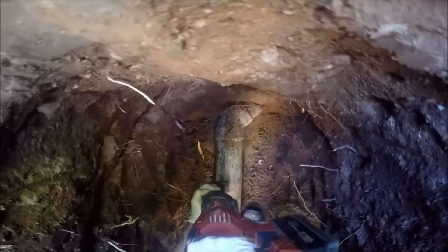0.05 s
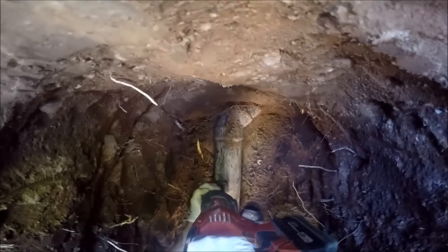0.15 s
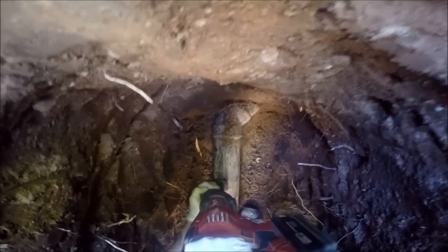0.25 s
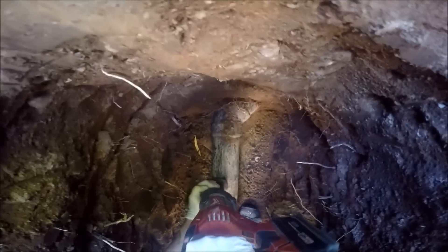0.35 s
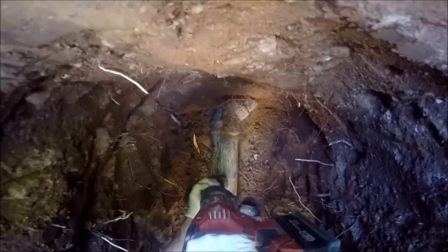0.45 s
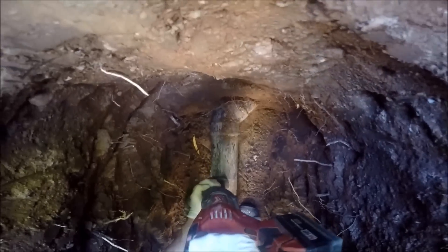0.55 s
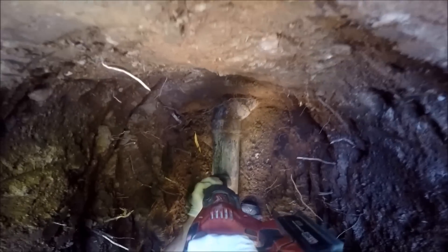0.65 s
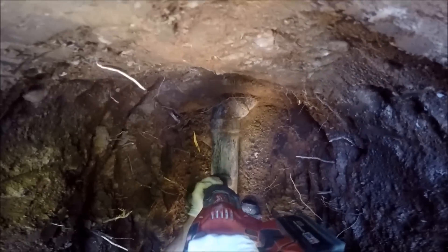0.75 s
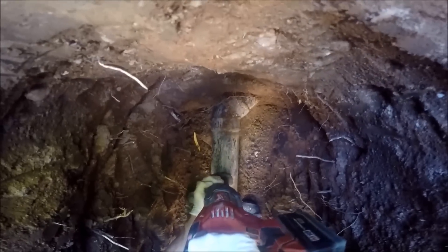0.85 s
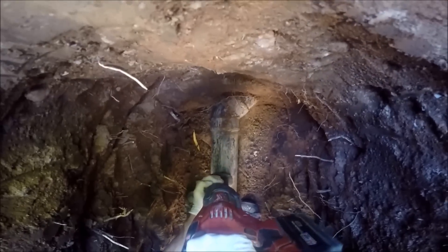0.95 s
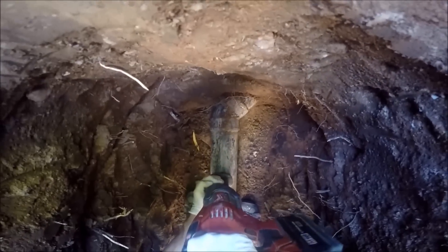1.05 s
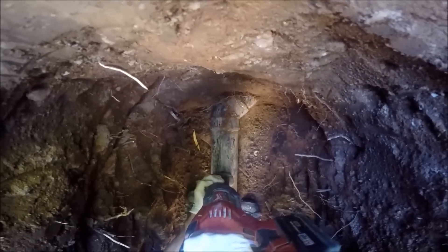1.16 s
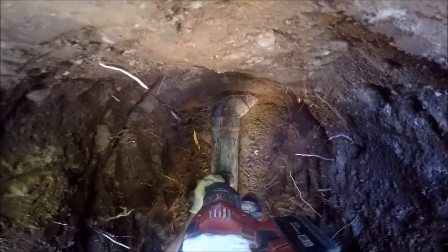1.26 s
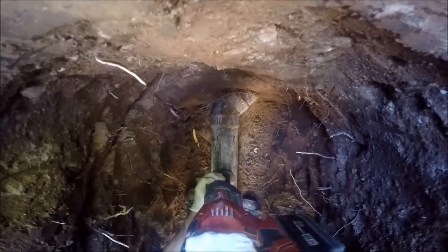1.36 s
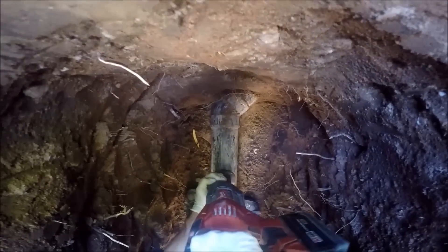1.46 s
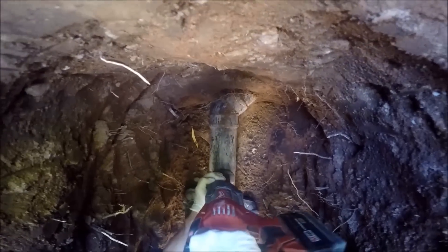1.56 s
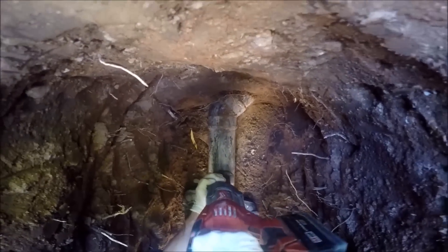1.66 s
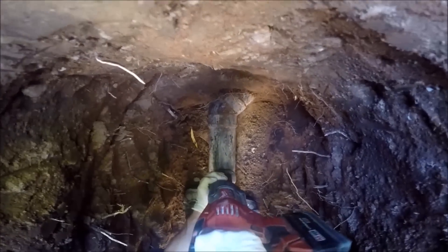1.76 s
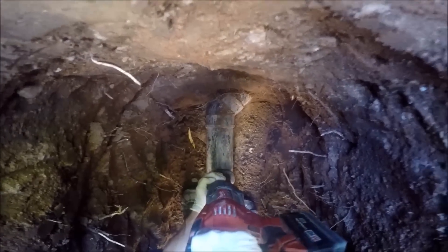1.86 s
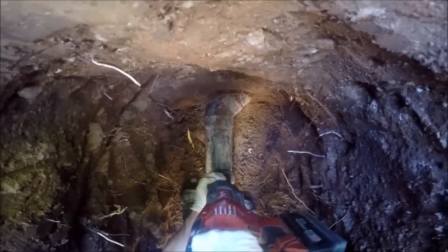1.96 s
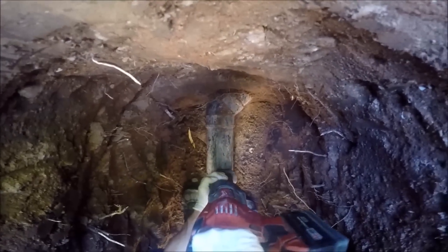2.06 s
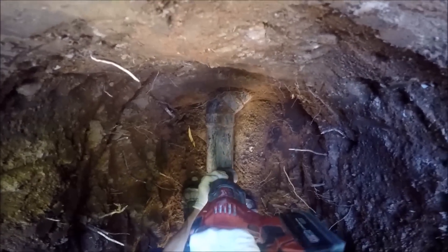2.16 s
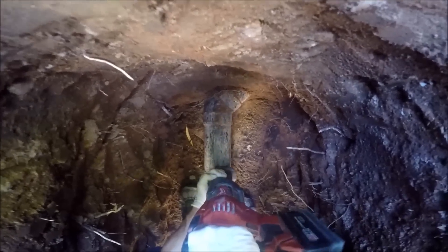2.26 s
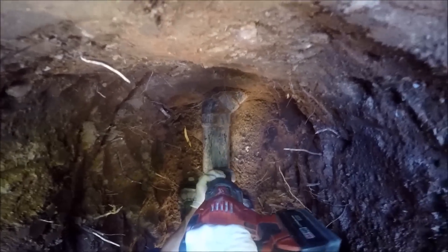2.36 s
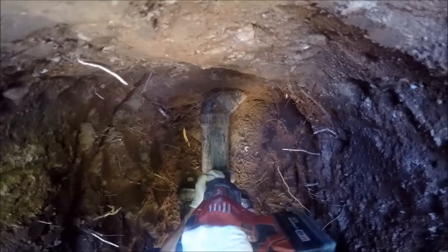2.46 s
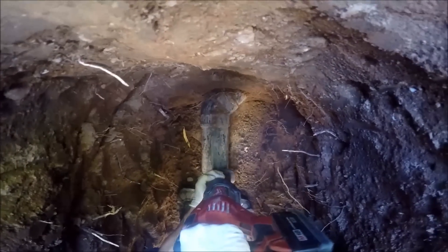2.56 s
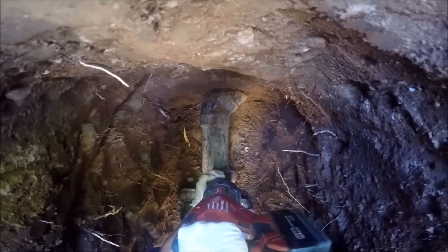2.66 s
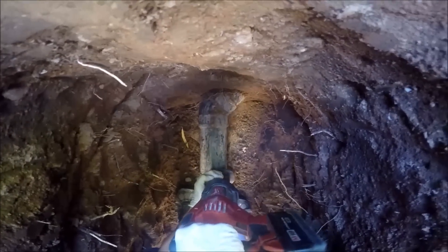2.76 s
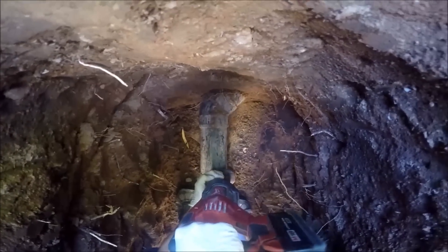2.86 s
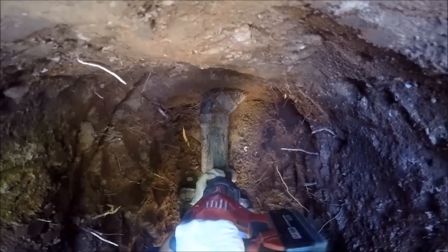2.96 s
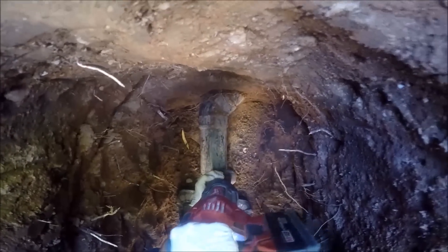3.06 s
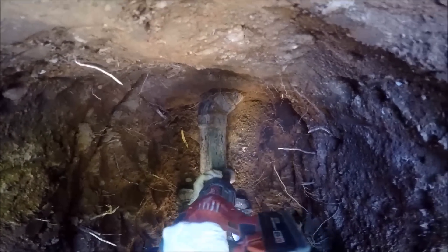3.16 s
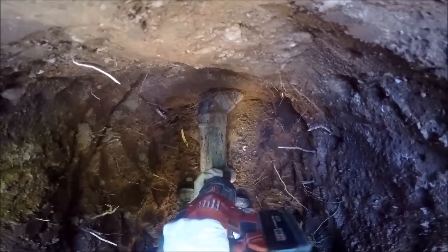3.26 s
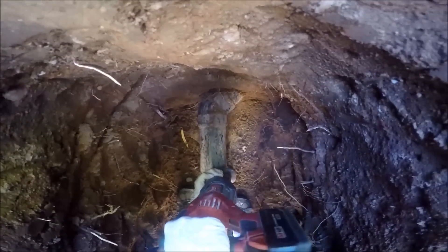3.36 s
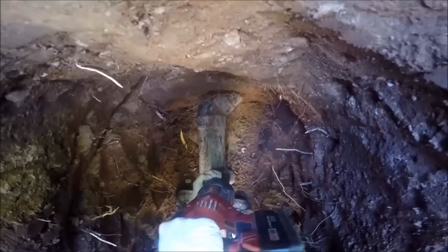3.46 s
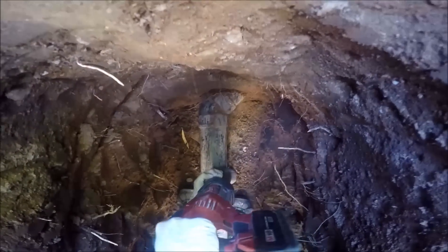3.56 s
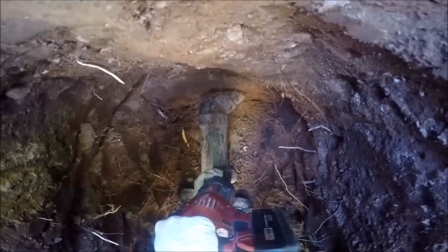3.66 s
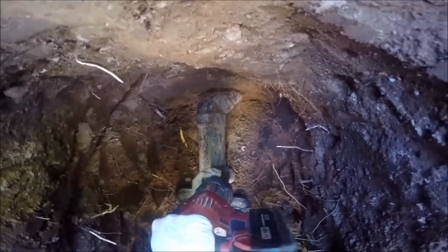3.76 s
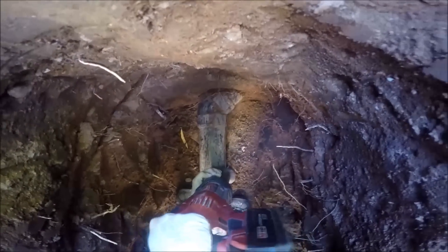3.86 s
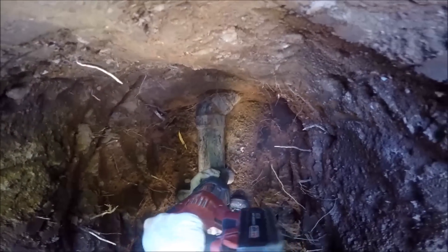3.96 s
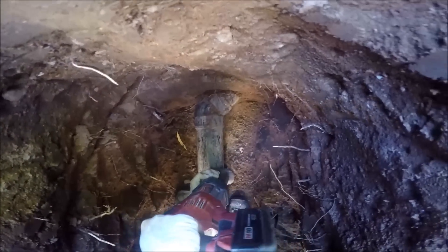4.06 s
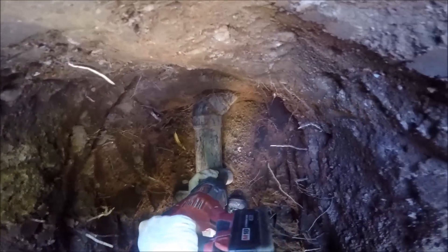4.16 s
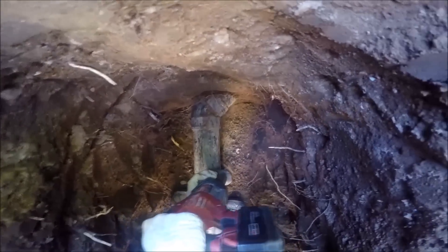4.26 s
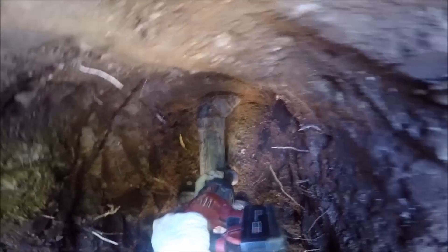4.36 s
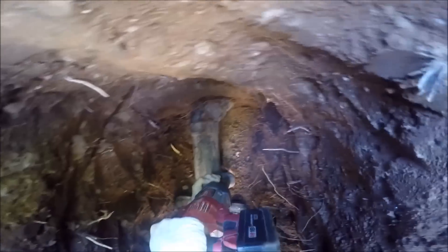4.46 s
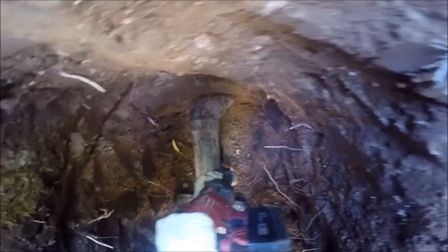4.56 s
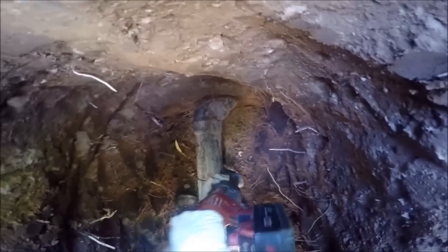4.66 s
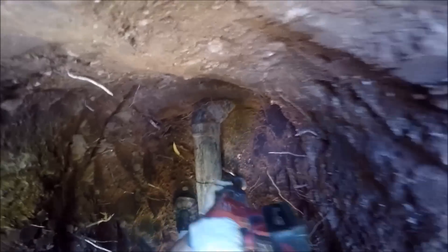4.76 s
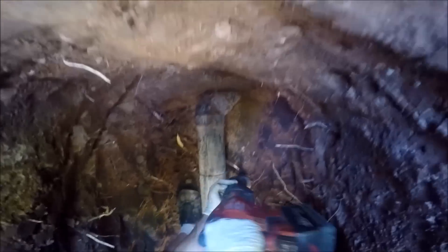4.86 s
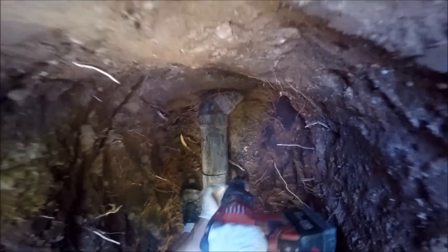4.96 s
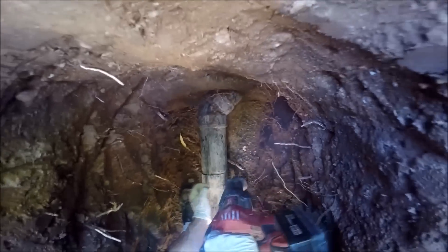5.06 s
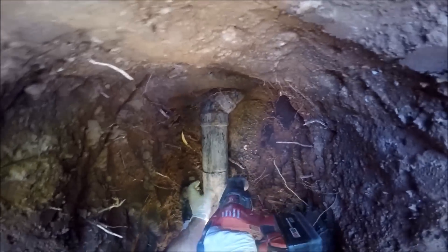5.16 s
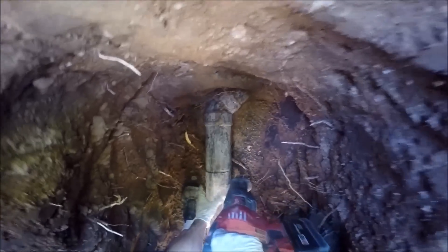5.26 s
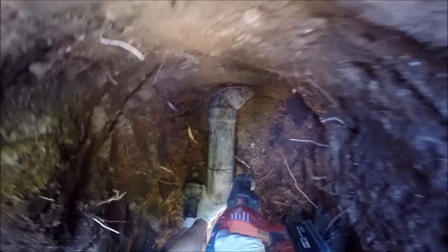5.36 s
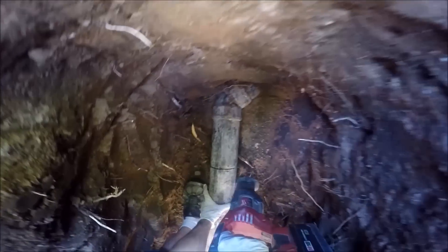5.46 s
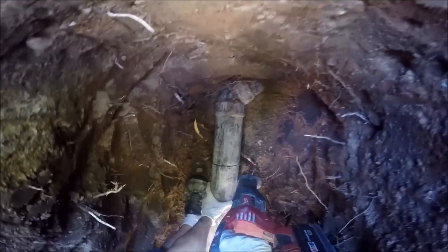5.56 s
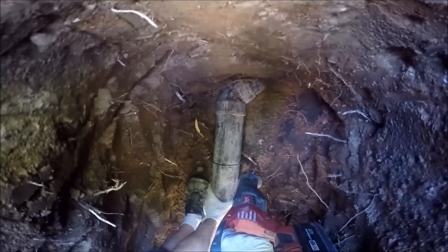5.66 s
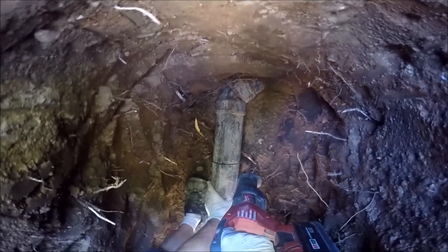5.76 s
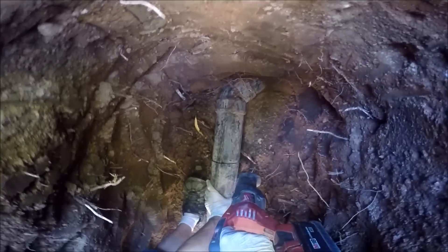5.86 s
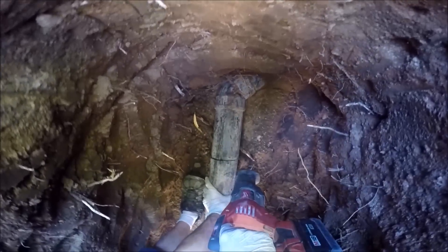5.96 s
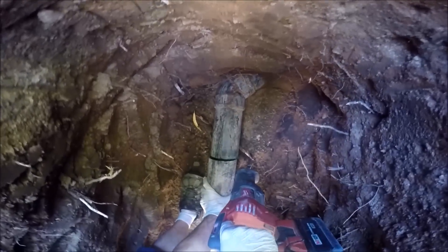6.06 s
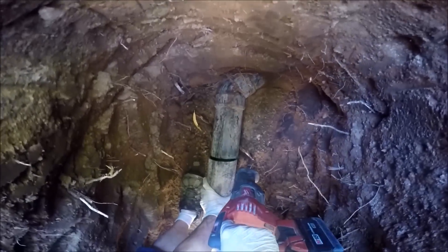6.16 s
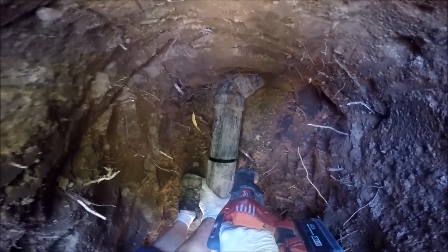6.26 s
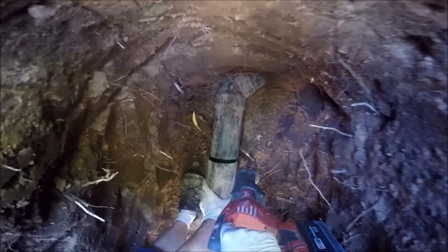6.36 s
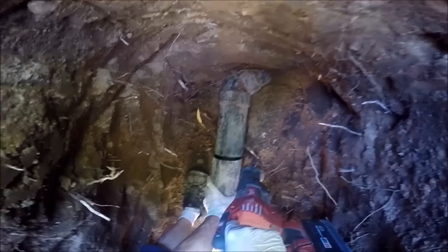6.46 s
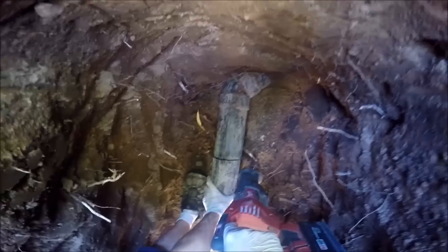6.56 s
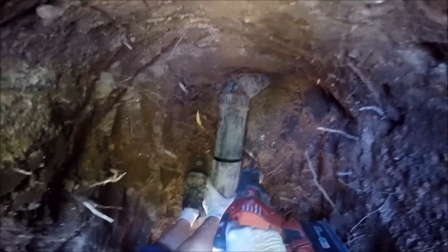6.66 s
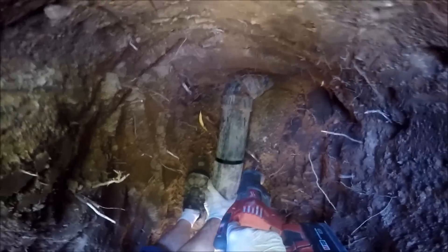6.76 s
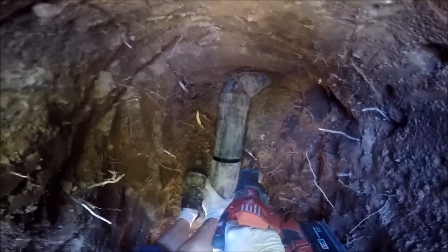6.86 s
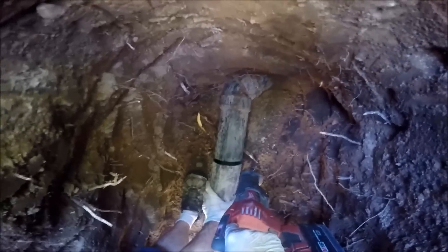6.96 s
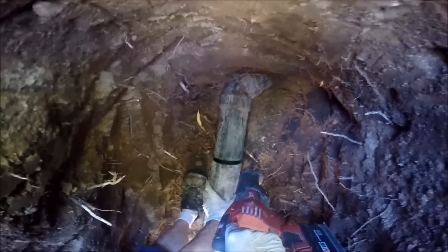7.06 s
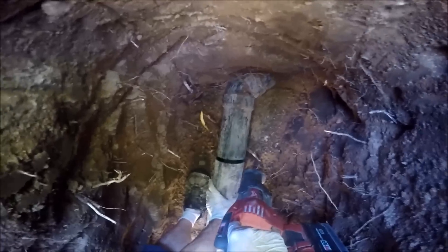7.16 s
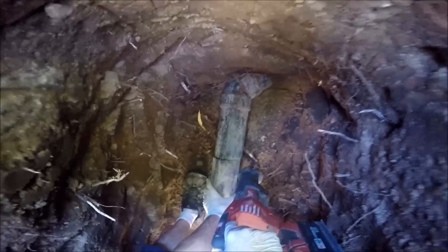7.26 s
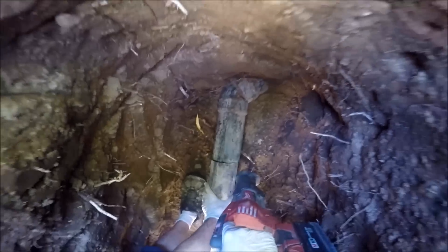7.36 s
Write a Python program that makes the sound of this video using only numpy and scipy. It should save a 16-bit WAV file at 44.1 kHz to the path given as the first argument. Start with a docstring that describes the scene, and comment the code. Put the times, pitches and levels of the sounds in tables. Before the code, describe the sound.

A saw is already running at full force: droning motor, rapid hammering of its shoe on a half-buried pipe, teeth tearing plastic. The knocking is roughest early and around two to three seconds, then smoother, brighter rasping takes over until the cut parts and the saw abruptly stops. Close, dry outdoor sound follows, with faint blade ringing, scraping gloves, grit ticks and muffled bumps.

```python
"""At the bottom of an earth pit, a cordless reciprocating saw cuts a plastic sewer pipe near a head-worn camera.
Each stroke shakes the tool, drones on its overtones, rasps the teeth through the wall and knocks the shoe
on the pipe, harder when the blade grabs. Filtered grains make the rasp, struck resonances the knocks.
The pipe parts and the saw falls silent; gloves scrape, the loose pipe and the saw bump, and the camera
mount rumbles. A faint high whine lies under everything."""
import sys
import numpy as np
from scipy import signal
from scipy.fft import rfft, irfft
from scipy.io import wavfile
from scipy.ndimage import uniform_filter1d

SR = 44100
rng = np.random.default_rng(int(sys.argv[2]) if len(sys.argv) > 2 else 0)


def generate_wav(signal):
    """Clip the signal to [-1, 1] and save it as 16-bit WAV at the path in sys.argv[1]."""
    frames = np.transpose(np.atleast_2d(signal))
    scaled = np.clip(frames, -1, 1) * 32767
    pcm = np.round(scaled).astype(np.int16)
    wavfile.write(sys.argv[1], SR, pcm)


N = 326781
T = np.arange(N) / SR

BRAKE_S, BRAKE_DB_PER_S = 4.862, 491  # the trigger is let go; the saw's level falls at this rate
LOOSE_S, LOOSE_SLEW_S = 4.01, 0.21  # the pipe starts to come loose; time until it is fully loose


def undb(db):
    """Decibels to gain."""
    return 10 ** (np.asarray(db) / 20)


def unit(x):
    """Scale to rms 1."""
    return x / np.sqrt(np.mean(x ** 2))


def walk(rate):
    """Slow random drift of rms near 1, with about `rate` new values per second."""
    k = int(SR / rate)
    steps = np.repeat(rng.standard_normal(N // k + 1), k)
    return unit(uniform_filter1d(steps, k)[:N])


def colour(x, points):
    """Minimum-phase filter with the given (Hz, dB) shape."""
    hz, db = np.transpose(points)
    size = 8192
    bin_hz = np.arange(size // 2 + 1) * SR / size
    shape = np.interp(np.log(bin_hz + 1), np.log(hz), db)
    # folding the cepstrum makes the response causal
    cepstrum = irfft(np.log(undb(shape)))
    cepstrum[1:size // 2] *= 2
    cepstrum[size // 2 + 1:] = 0
    response = irfft(np.exp(rfft(cepstrum)))
    return signal.fftconvolve(x, response)[:len(x)]


def resonate(x, hz, width):
    """One resonance, gain 1 at its centre."""
    return signal.lfilter(*signal.iirpeak(hz, hz / width, fs=SR), x)


def resonate_twice(x, hz, width):
    """The same resonance twice in a row, for steeper sides."""
    return resonate(resonate(x, hz, width), hz, width)


def add(out, s, sound):
    """Mix a sound in at time s."""
    i = max(int(s * SR), 0)
    out[i:i + len(sound)] += sound[:max(N - i, 0)]


def lobe(phase, centre, width):
    """A smooth gate that opens once per stroke."""
    return np.exp((np.cos(2 * np.pi * (phase - centre)) - 1) / (2 * np.pi * width) ** 2)


def grains(rate, spread_db):
    """Dense tiny clicks of uneven size, `rate` per second on average."""
    size = undb(spread_db * np.minimum(rng.exponential(size=N), 5))
    return unit((rng.random(N) < rate / SR) * rng.standard_normal(N) * size)


def swell(start, length, attack, release):
    """Rise before start, hold, fall."""
    rise = 1 + (T - start) / attack
    fall = 1 - (T - start - length) / release
    return np.clip(np.minimum(rise, fall), 0, 1)


def curve(rows):
    """Join (s, value) rows by straight lines."""
    return np.interp(T, *np.transpose(rows))


def looseness():
    """0 while the pipe holds firm, 1 once it has come loose."""
    return np.clip((T - LOOSE_S) / LOOSE_SLEW_S, 0, 1)


# Motor speed: it sags under load and races as the cut opens.
# Each row: time in seconds, strokes per second in Hz.
MOTOR_SPEED = [(0, 34.4), (.2, 35.9), (.35, 34.4), (.6, 35.6), (.75, 37), (1, 37.8), (1.15, 40.8),
               (1.35, 41.1), (1.7, 41), (2.1, 37.1), (2.3, 36.8), (2.42, 39.6), (2.85, 40.2), (3.3, 39.2),
               (4.1, 38.6), (4.25, 41.8), (4.5, 42.3), (4.87, 44.1)]
# How hard the teeth bite. Each row: time in seconds, rasp level in dB.
BITE_LEVEL = [(0, -29), (.2, -26), (.5, -32), (.85, -26.5), (1.1, -25), (1.4, -21.5), (1.8, -21.5),
              (2.05, -23.5), (2.5, -29), (2.9, -29), (3.3, -27), (3.8, -23), (4.5, -21.5), (4.6, -18),
              (4.86, -22.5)]
# How hard the shoe chatters on the pipe. Each row: time in seconds, reference level in dB.
CHATTER_LEVEL = [(0, -20), (.2, -16), (.4, -19), (.62, -21.5), (.95, -20), (1.12, -24), (1.6, -21),
                 (1.85, -18), (2.35, -17), (2.55, -19.5), (2.8, -19), (3.05, -23.5), (3.35, -20),
                 (3.8, -22.5), (4.02, -21.5), (4.25, -25), (4.6, -23.5), (4.86, -33)]


def saw():
    """All parts follow one crank phase; after the trigger is let go they fade within hundredths of a second."""
    bite_db, chatter_db = curve(BITE_LEVEL), curve(CHATTER_LEVEL)
    phase = np.cumsum(curve(MOTOR_SPEED)) / SR  # in strokes
    braking = undb(-BRAKE_DB_PER_S * np.maximum(T - BRAKE_S, 0))
    parts = teeth(phase, bite_db) + chatter(phase, chatter_db)
    parts = parts + mechanism(phase, bite_db, chatter_db) + last_strip(phase)
    return braking * parts


# Ringing of the blade and its clamp. Each row: pitch in Hz, width in Hz, relative level in dB.
BLADE_MODES = [(1457, 350, -4.5), (1814, 280, -3), (2380, 130, -2), (2660, 76, -0.5), (2720, 100, 0.5),
               (3104, 50, -1.5), (4575, 160, 1), (4860, 89, 6.5), (5400, 300, 1), (6100, 270, -2.5)]
# Colour of the torn plastic. Each row: frequency in Hz, relative level in dB.
RASP_COLOUR = [(450, -33.5), (700, -2), (920, 1), (1200, -3), (1500, -4), (2100, -6.5), (3100, -2.5),
               (3500, -8.5), (4100, -5), (4800, -7), (6100, -8.5), (6900, -22), (7500, -17.5),
               (9000, -29.5), (15000, -54)]
# Colour of the fine hiss over the rasp. Each row: frequency in Hz, relative level in dB.
HISS_COLOUR = [(6000, -24), (7500, 9), (8800, -14.5), (10100, 6), (11600, -0.5), (12600, 5), (15500, -20)]
# How separately the strokes bite: more at the start and in the last strip of wall.
# Each row: time in seconds, depth of the stroke pulse as an exponent.
STROKE_DEPTHS = [(0, 0.94), (.8, 1.1), (1.5, 0.56), (3.4, .95), (4.6, 1)]
HISS_DB = -25  # against the rasp


def teeth(phase, bite_db):
    """Teeth rasp in a short pull and a longer, equally high scuff, with one sharp clack per stroke."""
    pull, scuff = .5 * lobe(phase, 0.26, 0.14), 0.5 * lobe(phase, 0.74, 0.27)
    clack = 1.14 * lobe(phase, .13, 0.035)
    gate = (.5 + pull + scuff + clack) ** curve(STROKE_DEPTHS)
    # even out the power over a tenth of a second, then let it flutter
    gate = gate / np.sqrt(uniform_filter1d(gate ** 2, SR // 10)) * undb(1.0 * walk(70))
    chips = unit(colour(gate * grains(12000, 1.4), RASP_COLOUR))
    ring = 0
    for hz, width, db in BLADE_MODES:
        ring = ring + undb(db + 2.1 * walk(9)) * resonate(gate * grains(5000, 1.5), hz, width)
    # the blade rings more freely as the wall gives way
    ring_db = np.interp(T, [0, 3.4, 4.8], [-6, -4, -3])
    rasp = undb(-1 - 1.8 * looseness()) * chips + undb(ring_db) * unit(ring)
    hiss = undb(HISS_DB) * unit(colour(gate * grains(6000, 3.5), HISS_COLOUR))
    return undb(bite_db) * (rasp + hiss)


# Ringing of the half-buried pipe, struck close by. Each row: pitch in Hz before scatter,
# width in Hz, relative level in dB before sharpness and scatter.
PIPE_MODES = [(325.5, 64, -4.5), (432, 171, 5), (656, 96, 0), (805, 190, -10), (1220, 1200, -28)]
RECOIL_HZ, RECOIL_WIDTH_HZ, RECOIL_DB = 60, 28, -16  # each knock also jolts the tool


def knock(sharp_db, rattle=0.2):
    """The shoe lands, rebounds within milliseconds and rings the pipe; a sharper contact favours upper modes."""
    push = np.zeros(SR // 16)
    # the blow and its first quick rebound, then three small random ones
    push[0], push[int(.0022 * SR)] = 1, .55
    rebounds = (rng.uniform(0.00397, 0.01205, size=3) * SR).astype(int)
    np.add.at(push, rebounds, rattle * rng.standard_normal(size=3))
    ring = 0
    for hz, width, db in PIPE_MODES:
        tilt_db = sharp_db * min(np.log2(hz / PIPE_MODES[1][0]), 1)
        gain = undb(db + tilt_db + 2 * rng.standard_normal())
        hz = hz * np.exp(.035 * rng.standard_normal())
        ring = ring + gain * resonate_twice(push, hz, width)
    t = T[:len(push)]
    crack = rng.standard_normal(len(t)) * np.exp(-t / 0.0036) * (1 - np.exp(-t / .001))
    crack = undb(-29.0) * resonate(crack, 2600, 3500)
    recoil = resonate_twice(push, RECOIL_HZ, RECOIL_WIDTH_HZ)
    return ring / np.abs(ring).max() + undb(RECOIL_DB) * recoil / np.abs(recoil).max() + crack


# Single hard knocks when the teeth grab.
# Each row: time in seconds, level in dB, sharpness of the contact in dB.
GRAB_KNOCKS = [(.304, -2.5, 12), (.368, -1, -9), (.422, -2.5, -7), (.536, -1.5, -1), (.597, -5, 9),
               (.651, -7, 10), (.703, -3, 7), (2.043, -5.5, 12), (2.233, -4.5, 7.5), (2.396, -0.5, 1),
               (2.595, -3.5, 13), (2.671, -2.5, 2), (2.744, -4, 2), (2.847, -4, -7), (2.971, -3.5, 0),
               (3.07, -5, 1), (3.095, -4, 3), (3.171, -5.5, 0), (4.553, -14, -15), (4.577, -7.5, -11)]
# Bouts in which the saw bounces on every stroke.
# Each row: start in seconds, end in seconds, level in dB before scatter, sharpness of the contact in dB.
BOUNCE_BOUTS = [(.19, .5, -6.5, -7), (.74, .94, -9.5, 1), (2.03, 2.38, -6.5, 12.5), (2.43, 2.49, -4, -3),
                (2.76, 2.89, -6, 1)]
STROKE_DB, STROKE_SCATTER_DB = 8, 1.5  # the knock of an ordinary stroke against the chatter level
BOUNCE_PHASE, BOUNCE_SCATTER_DB = .85, 1  # where in the stroke the shoe lands; unevenness of the bounces
JUDDER_DB, PINCH_JUDDER_DB = -11.5, -21  # blade judder against the chatter level; its level when pinched
PINCH_S, PINCH_LENGTH_S, PINCH_SLEW_S = 2.006, .27, 0.091  # the kerf closes on the blade


def chatter(phase, chatter_db):
    """The shoe knocks once a stroke, harder while the saw bounces or the teeth grab; the pinched blade judders."""
    out = np.zeros(N)
    grab_s = np.array(GRAB_KNOCKS)[:, 0]
    for i in np.flatnonzero(np.diff(np.floor(phase - BOUNCE_PHASE)) > 0):
        late, strength = rng.standard_normal(2)
        db, sharp_db = chatter_db[i] + STROKE_DB + STROKE_SCATTER_DB * strength, .67
        s = T[i] + .0007 * late
        for start, end, bounce_db, bounce_sharp_db in BOUNCE_BOUTS:
            if start < T[i] < end:
                db, sharp_db = bounce_db + BOUNCE_SCATTER_DB * strength, bounce_sharp_db
        blow = knock(sharp_db)
        # a grab replaces an ordinary knock close to it
        if np.abs(grab_s - s).min() > .013:
            add(out, s, blow * undb(db))
    for s, db, sharp_db in GRAB_KNOCKS:
        add(out, s, knock(sharp_db) * undb(db))
    judder = colour(lobe(phase, .14, 0.084) * grains(2500, 0.98),
                    [(400, -29), (620, 4), (850, -2), (1100, -12.5), (1700, -15.5), (3000, -51.0)])
    pinch = undb(PINCH_JUDDER_DB) * swell(PINCH_S, PINCH_LENGTH_S, PINCH_SLEW_S, PINCH_SLEW_S)
    firm = undb(chatter_db + JUDDER_DB) * (1 - looseness())
    return out + np.hypot(firm, pinch) * unit(judder)


# Drone of the crank and housing. Each row: multiple of the stroke rate, relative level in dB.
DRONE_OVERTONES = [(2, -7), (4, -9.5), (5, -2.5), (6, -3), (7, -4.5), (8, 0), (9, -2.5), (10, -11.5),
                   (11, -15), (12, -11), (13, -4), (14, -15.5), (15, -23), (16, -11.5), (17, -17.5),
                   (18, -15), (19, -13.5), (20, -17), (22, -11.5), (23, -25), (26, -18), (27, -15)]
# Overtones that swell while they sit on a resonance of tool and pipe.
# Each row: start in seconds, end in seconds, multiple of the stroke rate, added level in dB.
OVERTONE_SWELLS = [(0, 1.9, 5, -33), (1.25, 2.7, 9, -22), (1.5, 4.1, 12, -33.5), (3, 3.68, 6, -34.5),
                   (3.55, 4.32, 6, -22.5), (3.7, 4, 11, -23.5), (3.85, 4.5, 8, -27)]
# Hum on the third overtone of the stroke. Each row: time in seconds, level in dB before drift.
HUM_LEVEL = [(0, -19), (.25, -18.5), (.62, -22.5), (1.02, -15), (1.12, -22), (1.5, -25), (1.98, -18),
             (2.25, -25.5), (2.45, -22), (2.8, -27), (4.05, -25), (4.86, -32)]
# The loosening pipe swings along with the blade. Each row: start in seconds, length in seconds, level in dB.
PIPE_LURCHES = [(4.222, .13, -25), (4.6, 0.092, -28)]
SHAKE_DB, SHAKE_PER_BITE = -7.5, .62  # to-and-fro shake: offset, and dB per dB of bite
DRONE_DB, DRONE_PER_CHATTER, SLACK_DB = -13.5, 0.59, -2.5  # drone and linkage rattle follow the chatter
LOOSE_DRONE_DB = -1  # the drone gives way a little once the pipe is loose
GROWL_HZ, GROWL_WIDTH_HZ = 315, 170  # a growl of the loose pipe
GROWL_DB, GROWL_DB_PER_S = -22, -8.5  # its level when fully loose, and how it fades


def mechanism(phase, bite_db, chatter_db):
    """The reciprocating mass shakes tool and pipe; crank and housing drone on the overtones of the stroke."""
    turn, loose = 2 * np.pi * phase, looseness()
    swing = undb(SHAKE_DB + SHAKE_PER_BITE * bite_db + 1.3 * walk(9))
    for start, length, db in PIPE_LURCHES:
        swing = swing + undb(db) * swell(start, length, 0.053, 0.047)
    hum = undb(curve(HUM_LEVEL) + 2.05 * walk(14)) * np.sin(3 * turn + 0.1 * walk(29))
    shake = swing * np.sin(turn) + hum
    growl = (0.52 + lobe(phase, 0.23, 0.14)) * grains(2500, 0.73)
    growl = unit(resonate_twice(growl, GROWL_HZ, GROWL_WIDTH_HZ))
    growl = growl * loose * undb(GROWL_DB + GROWL_DB_PER_S * (T - LOOSE_S - LOOSE_SLEW_S))
    # the drone's phase wanders more once the pipe comes loose
    unrest = 0.24 + 0.65 * loose
    drone = 0
    for order, db in DRONE_OVERTONES:
        size = undb(DRONE_DB + DRONE_PER_CHATTER * chatter_db + LOOSE_DRONE_DB * loose + db)
        for start, end, multiple, swell_db in OVERTONE_SWELLS:
            if multiple == order:
                size = size + undb(swell_db) * np.clip(np.minimum(T - start, end - T) / 0.081, 0, 1)
        wave = np.sin(order * turn + 2 * np.pi * rng.random() + unrest * walk(22))
        drone = drone + size * undb(1.84 * walk(6)) * wave
    # play in the linkage blurs the drone while the shoe chatters
    slack = colour(grains(900, 1.5), [(30, -15.5), (65, 0), (95, -1.0), (140, 5), (190, -1.0), (330, 7.5),
                                      (480, 3.0), (620, -10.5), (2000, -45.0)])
    return shake + drone + growl + undb(chatter_db + SLACK_DB) * unit(slack)


# Hollow ringing of the cut pipe when touched. Each row: pitch in Hz, width in Hz, relative level in dB.
HOLLOW_MODES = [(570, 50, 3), (913, 66, -2), (1410, 130, 7.5), (2270, 310, -3), (2980, 57, -12),
                (4130, 78, -3), (4450, 180, -4), (4720, 200, 0.5), (5330, 100, -7), (5780, 110, -0.5)]


def hollow(x):
    """The cut pipe rings on its own modes when a sound excites it."""
    return sum(undb(db) * resonate(x, hz, width) for hz, width, db in HOLLOW_MODES)


def last_strip(phase, full_s=4.78, full_db=-27.0, rise_db_per_s=12):
    """As the last strip of wall thins, the strokes ring the hollow pipe ever more."""
    ring_db = full_db - rise_db_per_s * np.maximum(full_s - T, 0)
    strokes = (0.37 + lobe(phase, 0.24, 0.069)) * grains(4000, 1.2)
    return undb(ring_db) * unit(hollow(strokes))


# The freed blade rings on. Each row: pitch in Hz, starting level in dB, time to fall by 60 dB in seconds.
BLADE_AFTER_RING = [(2960, -58, 1.3), (3080, -64, 0.94), (4190, -65, 1.5)]


def freed_blade():
    """The steel blade shivers on after the saw is let go: narrow bands of noise that die away."""
    age = np.maximum(T - BRAKE_S, 0)
    ring = 0
    for hz, db, t60 in BLADE_AFTER_RING:
        ring = ring + undb(db - 60 * age / t60) * unit(resonate(rng.standard_normal(N), hz, 40))
    return (age > 0) * ring


# Clicks of grit and plastic. Each row: time in seconds, peak in dB, time to fall by 60 dB in seconds.
GRIT_CLICKS = [(4.970, -34, 0.028), (5.0394, -27.5, 0.043), (5.244, -38, .041), (5.339, -29, 0.041),
               (5.408, -31.5, .047), (5.445, -29, .03), (5.476, -30, 0.016), (5.702, -38, .03),
               (5.8326, -28.5, 0.014), (6.0516, -36, 0.038), (6.551, -41, 0.04), (6.6237, -29, 0.036),
               (6.7576, -27, 0.055), (7.016, -40, .049), (7.103, -46, .045), (7.323, -24, 0.037)]
# Colour of those clicks. Each row: frequency in Hz, relative level in dB.
CLICK_COLOUR = [(300, 10.5), (600, 7.5), (1000, 5), (2700, 6.5), (3500, 2.5), (5000, 12.5), (6400, -4),
                (8000, -11), (15000, -43)]
# Dull bumps of the loose pipe and the saw. Each row: time in seconds, peak in dB before a common 2.5 dB lift,
# pitch in Hz, time to fall by 60 dB in seconds.
DULL_BUMPS = [(5.038, -16.5, 330, 0.031), (5.046, -25.5, 267, .2), (5.05, -36, 429, .25),
              (5.123, -26.5, 328, 0.077), (5.207, -31.5, 288, 0.089), (5.447, -35, 840, 0.036),
              (5.83, -34.5, 537, 0.026), (6.622, -42, 334, 0.061), (6.718, -22.5, 298, 0.13),
              (6.757, -42, 565, .06), (7.318, -28.5, 564, 0.13), (7.322, -17, 298, 0.16),
              (7.325, -15, 81.5, 0.075)]


def knocks():
    """Grit and plastic click; pipe and saw bump, damped by the soil."""
    out, t = np.zeros(N), T[:SR // 4]
    for s, db, t60 in GRIT_CLICKS:
        touch = rng.standard_normal(len(t)) * undb(-60 * t / t60) * (1 - np.exp(-t / 0.001))
        click = unit(colour(touch, CLICK_COLOUR)) + undb(-4.5) * unit(hollow(touch))
        add(out, s - .002, undb(db) * click / np.abs(click).max())
    for s, db, hz, t60 in DULL_BUMPS:
        turn = 2 * np.pi * hz * t
        bump = np.sin(turn) + 0.26 * np.sin(1.256 * turn) + 0.6 * np.sin(0.67 * turn)
        bump = bump * undb(-60 * t / t60) * (1 - np.exp(-t / 0.0025))
        add(out, s, undb(db + 2.5) * bump / np.abs(bump).max())
    return out


# Hand movements on pipe and saw. Each row: start in seconds, length in seconds,
# sleeve and glove rub level in dB, gritty scrape level in dB.
HAND_MOVES = [(4.926, 0.17, -39.5, -68), (5.32, 0.063, -48, -54), (5.433, 0.053, -40.5, -49.5),
              (5.672, .15, -50, -56.5), (6.11, 0.067, -40, -55.5), (6.26, 0.15, -45.5, -58),
              (6.584, 0.2, -36, -55.5), (7.298, 0.025, -30.5, -51)]
# Colour of the gritty scrape. Each row: frequency in Hz, relative level in dB.
SCRAPE_COLOUR = [(500, -13), (700, 0), (1100, -15), (1390, -14), (1700, 0.5), (2300, -4.5), (3550, -5.5),
                 (4200, -1.5), (5200, -5), (6400, -12.5), (8400, -28), (13000, -22), (15000, -20)]
# Colour of the rumble in the camera mount. Each row: frequency in Hz, relative level in dB.
RUMBLE_COLOUR = [(13, -13), (22, -12), (59, 7), (86, -9), (118, -0.5), (140, -18), (166, -10), (237, -24.5),
                 (299, -21), (427, -29), (548, -56), (900, -59), (1170, -63), (1980, -120)]
MOVE_ATTACK_S, MOVE_RELEASE_S = 0.054, .06
REST_RUB_DB, REST_SCRAPE_DB = -48.5, -60  # the resting glove
LET_GO_S, LET_GO_DB = 6.8, -4.5  # it scrapes less once it lets go of the pipe
RUMBLE_DB, RUMBLE_DB_PER_S, RUMBLE_SWAY_DB = -35.5, 3, 2  # the mount rumbles more as the body starts to rise
CRUMBS_S, CRUMBS_LENGTH_S, CRUMBS_PER_S, CRUMBS_DB = 5.33, 0.565, 160, -61


def handling():
    """Body movement rumbles through the mount; gloves rub and drag grit along the pipe; soil crumbles."""
    rubbing, scraping = undb(REST_RUB_DB), undb(REST_SCRAPE_DB + LET_GO_DB * (T > LET_GO_S))
    for start, length, rub_db, scrape_db in HAND_MOVES:
        move = swell(start, length, MOVE_ATTACK_S, MOVE_RELEASE_S)
        rubbing = np.hypot(rubbing, undb(rub_db) * move)
        scraping = np.hypot(scraping, undb(scrape_db) * move)
    rumble_db = RUMBLE_DB + RUMBLE_DB_PER_S * (T - BRAKE_S) + RUMBLE_SWAY_DB * walk(14)
    rumble = undb(rumble_db) * unit(colour(rng.standard_normal(N), RUMBLE_COLOUR))
    rub = unit(colour(grains(2000, 1.0), [(90, -18), (200, 4.5), (340, 1.5), (450, -6.5), (600, -15.5),
                                          (1200, -25.5), (4000, -51)]))
    grit = grains(7000, 0.87) * undb(1.5 * walk(45))
    scrape = undb(-1.5) * unit(colour(grit, SCRAPE_COLOUR)) + undb(-5.5) * unit(hollow(grit))
    crumbs = unit(resonate_twice(grains(CRUMBS_PER_S, 1.2), 5600, 1800))
    crumbs = crumbs * undb(CRUMBS_DB) * swell(CRUMBS_S, CRUMBS_LENGTH_S, MOVE_ATTACK_S, MOVE_RELEASE_S)
    # one brief, very bright swish
    swish = undb(-55) * np.exp(-((T - 5.48) / .025) ** 2) * unit(resonate_twice(grit, 13800, 2500))
    after_saw = np.clip((T - BRAKE_S) / MOVE_ATTACK_S, 0, 1)
    return after_saw * (rumble + rubbing * rub + scraping * scrape) + crumbs + swish


def whine():
    """A faint high whine: two sines an octave apart with slightly wandering phase."""
    upper = undb(-66.5) * np.sin(2 * np.pi * 12618 * T + .6 * walk(40))
    lower = undb(-74) * np.sin(2 * np.pi * 6309 * T + .3 * walk(40))
    return upper + lower


def scene():
    """The saw close by, its freed blade, the bumps and the handling, over the whine."""
    return (saw() + freed_blade() + knocks() + handling() + whine())[None]


TOP_HZ = 15300  # upper limit of the camera's microphone


def record(dry):
    """The camera rounds the highest peaks and cuts the top."""
    rounded = dry / (1 + dry ** 6) ** (1 / 6)
    return signal.sosfilt(signal.ellip(10, .1, 80, TOP_HZ, fs=SR, output="sos"), rounded)


dry = scene()
out = record(dry)
generate_wav(out)
```